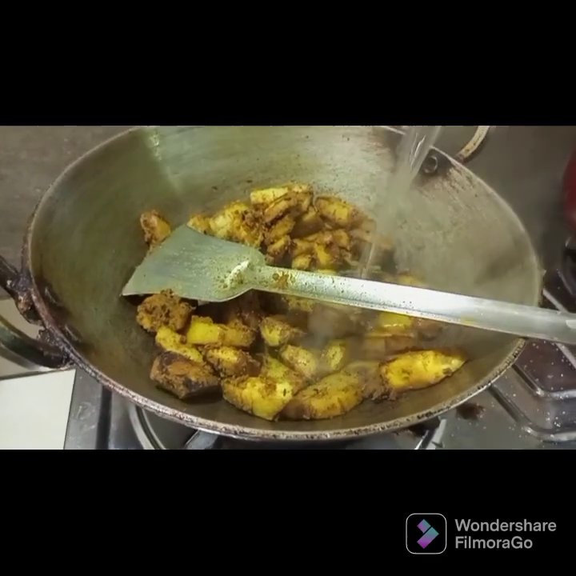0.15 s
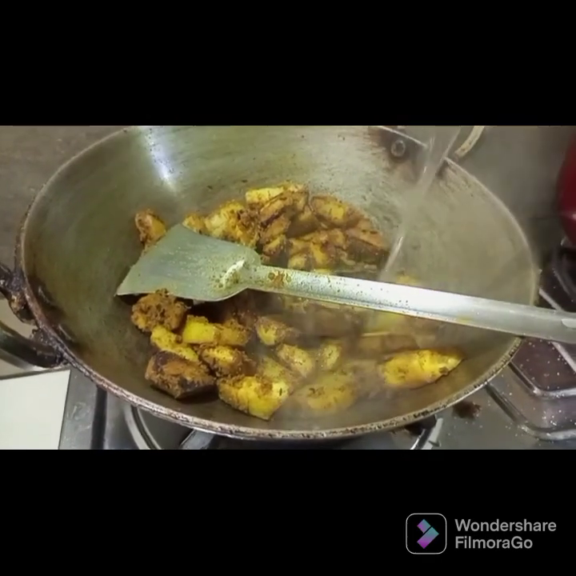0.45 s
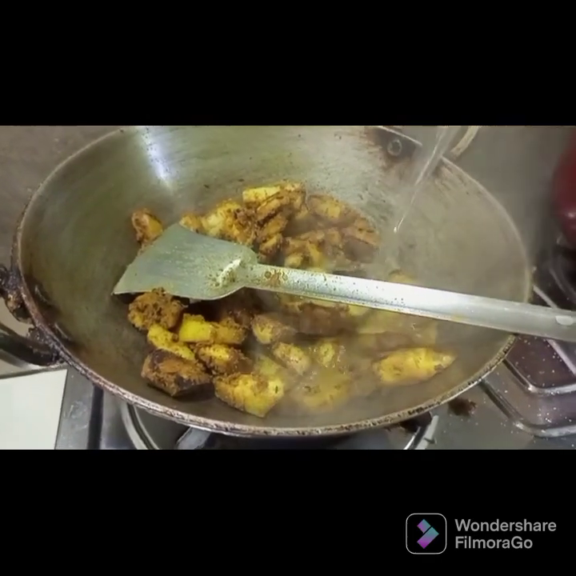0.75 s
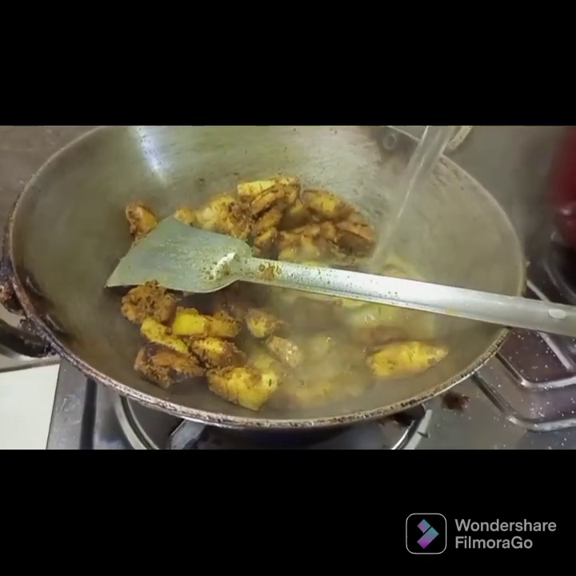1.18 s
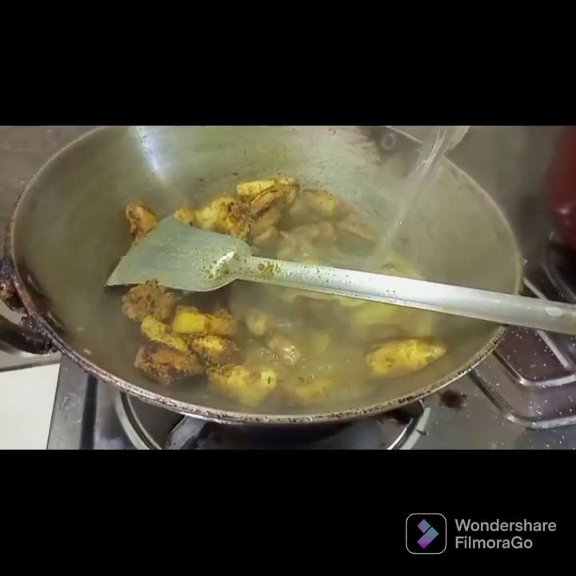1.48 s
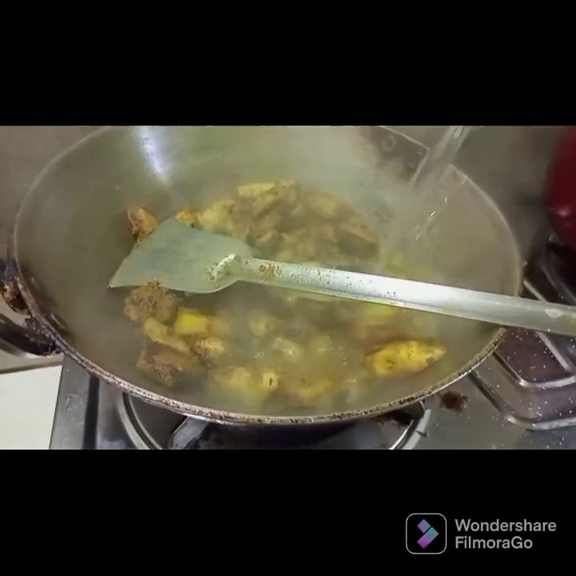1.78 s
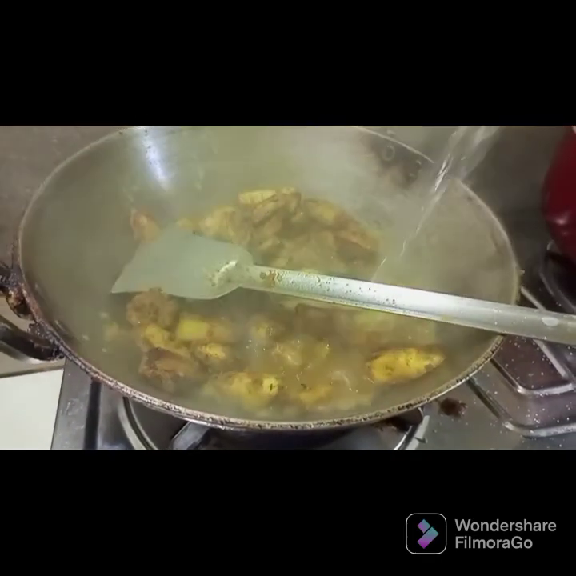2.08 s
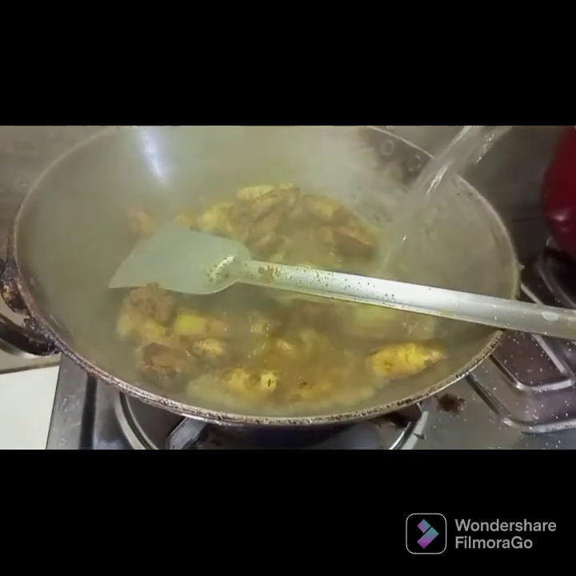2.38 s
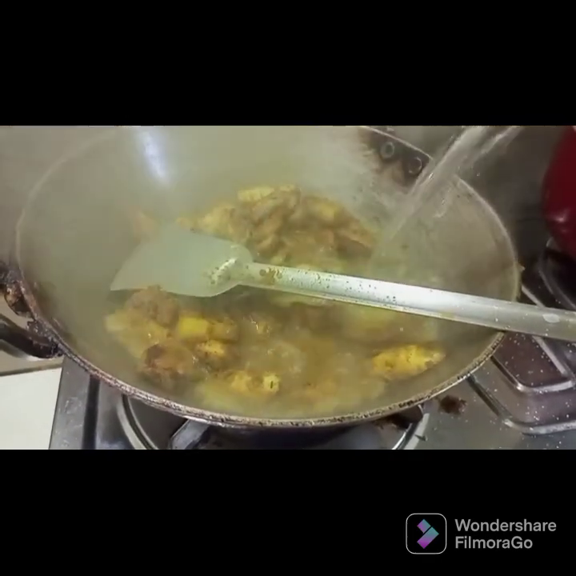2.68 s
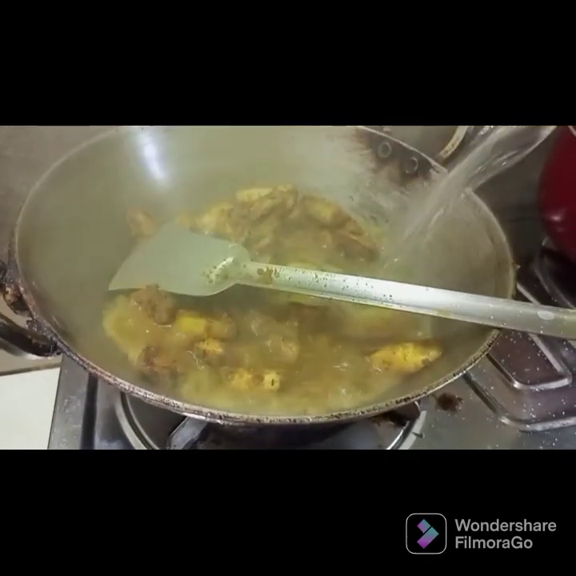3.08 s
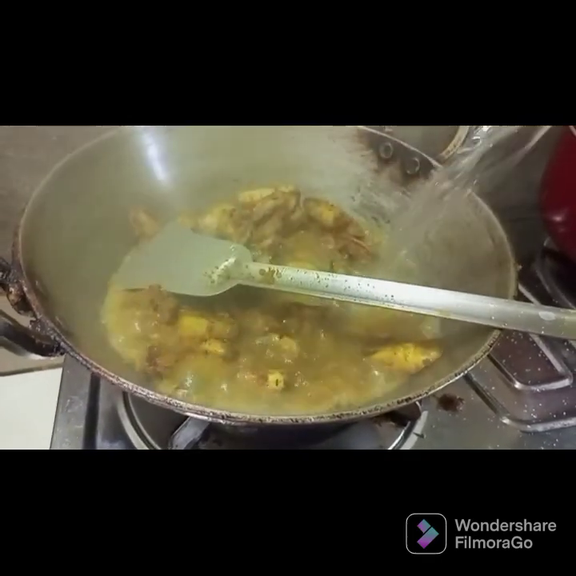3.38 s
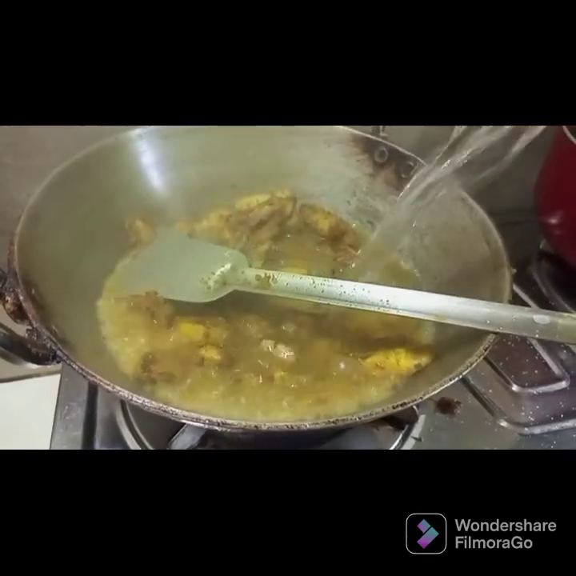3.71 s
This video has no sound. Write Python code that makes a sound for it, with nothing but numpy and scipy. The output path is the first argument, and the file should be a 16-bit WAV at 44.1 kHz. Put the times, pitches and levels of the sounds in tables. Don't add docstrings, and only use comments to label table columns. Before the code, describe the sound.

Water poured into a hot steel pan sizzles and hisses brightly, then gradually dies down

```python
import sys
import numpy as np
from scipy import signal
from scipy.fft import rfft, irfft, next_fast_len
from scipy.io import wavfile
from scipy.ndimage import uniform_filter1d, map_coordinates

SR = 44100
rng = np.random.default_rng(int(sys.argv[2]) if len(sys.argv) > 2 else 0)


def nominal_scale(level):
    x = np.asarray(level, float) / 20
    return 10 ** x


def file_out(sig):
    cols = np.atleast_2d(sig).T
    lim = np.clip(cols, -1, 1)
    pcm = np.round(lim * 32767).astype(np.int16)
    wavfile.write(sys.argv[1], SR, pcm)


N = 169785
TIME_S = np.arange(N) / SR


def unit(x):
    return x / np.sqrt(np.mean(x ** 2) + 1e-20)


def wobble(rate):
    knots = rng.standard_normal(int(N * 40 / SR) + 4)
    return map_coordinates(knots, [np.arange(N) * min(rate, 40) / SR])


def swing_of(rows):
    start_s, level_db = np.transpose(rows)
    curve = np.interp(TIME_S, start_s, level_db)
    return curve.mean(), curve - curve.mean()


def filtered(x, response):
    m = next_fast_len(N + SR // 2)
    return irfft(rfft(x, m) * response(np.fft.rfftfreq(m, 1 / SR)), m)[..., :N]


def coloured(x, spectrum):
    f, db = np.transpose(spectrum)
    return unit(filtered(x, lambda hz: nominal_scale(np.interp(np.log(hz + 1), np.log(f + 1), db))))


def patchy(patchy_db, wide, long):
    z = signal.stft(rng.standard_normal(N), nperseg=512)[2]
    field = uniform_filter1d(rng.standard_normal(z.shape), wide, axis=0)
    field = uniform_filter1d(field, long, axis=1)
    return unit(signal.istft(z * nominal_scale(patchy_db * unit(field)), nperseg=512)[1][:N])


def bubbles(count, low_hz, high_hz, cycles, spread_db, size):
    when, pitch, big, turn = rng.random((count, 4)).T[:, :, None]
    hz = low_hz + (high_hz - low_hz) * pitch
    k = np.arange(size)
    life = k / SR * hz / cycles
    strength = nominal_scale(-spread_db * np.log(big + 1e-4)) * np.sqrt(hz)
    tone = strength * life * np.exp(-3 * life) * np.sin(2 * np.pi * (hz * k / SR + turn))
    tone = tone * np.hanning(2 * size)[size:]
    return unit(np.bincount(((when * N).astype(int) + k).ravel(), tone.ravel(), N + size)[:N])


def ticks(count, spread_db):
    when, big = rng.random((count, 2)).T
    return unit(np.bincount((when * N).astype(int), -nominal_scale(-spread_db * np.log(big + 0.021)), N))


def singing(rows):
    rise, flutter_db, drift_rad = .015, 3, .9
    out = np.zeros(N)
    for s, hz, db, length in rows:
        near = slice(max(int((s - 2 * length) * SR), 0), int((s + 2 * length) * SR))
        u = (TIME_S[near] - s) / length
        knots = rng.standard_normal((2, 20))
        shake, drift = map_coordinates(knots, [[0 * u, 0 * u + 1], [4 * u + 10] * 2], mode="nearest")
        turn = 2 * np.pi * hz * length * (u + rise * u * u / 2) + drift_rad * drift
        out[near] += nominal_scale(db + 7.5 + flutter_db * shake) * np.exp(-2.5 * u * u) * np.sin(turn)
    return out


def hum():
    return np.sin(2 * np.pi * 100 * np.arange(N) / SR) * nominal_scale(-44 + 1.4 * wobble(6))


# pitch_hz [Hz], level_db [dB per Hz]
BURNER_SPECTRUM = [(25, -35), (45, -19), (70, -11.5), (160, -5), (243, -8), (420, -8), (560, -14.5),
                   (780, -32.5)]


def burner():
    return coloured(patchy(0.82, wide=2, long=8), BURNER_SPECTRUM)


# start_s [s], pitch_hz [Hz], level_db [dB rms], length_s [s]
GULP_EVENTS = [(.08, 382, -63, .07), (.21, 487, -62, 0.055), (0.272, 297, -66, 0.056),
               (0.686, 110, -66, 0.035), (.76, 151, -65, 0.039), (.85, 275, -68, 0.045),
               (1.1, 480, -60, 0.045), (1.248, 317, -66, 0.12), (1.3, 151, -65, 0.025),
               (1.682, 285, -66.5, 0.087), (1.806, 293, -68, 0.047), (.02, 90, -68, 0.016),
               (.64, 302, -58, 0.022), (.72, 320, -61, .025), (.97, 62, -83, 0.034), (1.05, 75, -67, .025),
               (1.32, 90, -70, 0.016), (1.12, 290, -64, .03), (2.16, 169, -64, 0.032),
               (2.36, 120, -74, .025), (2.65, 160, -68, 0.028), (2.125, 75, -63, 0.028),
               (2.947, 75, -70, .03), (3.165, 81, -63, 0.031), (2.48, 706, -74, 0.038),
               (2.95, 696, -67, 0.04), (1.88, 500, -61, 0.021), (3.24, 197, -71, .04),
               (3.82, 506, -65, 0.036)]


def gulps():
    return nominal_scale(-5.5) * singing(GULP_EVENTS)


# start_s [s], pitch_hz [Hz], level_db [dB rms], length_s [s]
SINGER_EVENTS = [(.035, 1270, -47, 0.015), (.058, 5986, -32, .02), (.131, 3555, -40, 0.027),
                 (.139, 1190, -47, 0.032), (.197, 1340, -51, .025), (.418, 2070, -47, 0.032),
                 (.438, 3430, -40, 0.042), (.572, 4180, -33.5, 0.022), (.2, 900, -54, 0.044),
                 (.29, 843, -51, 0.017), (.229, 486, -55, .04), (.432, 1280, -47, 0.027),
                 (.496, 925, -52, 0.043), (.554, 1900, -46, 0.034), (.862, 3950, -32, 0.018),
                 (.801, 1350, -52, 0.031), (.879, 1390, -51, 0.022), (.891, 3531, -36, 0.018),
                 (1.013, 5940, -41, .02), (1.088, 3540, -38, 0.041), (1.097, 4360, -41, 0.06),
                 (1.109, 1244, -49, 0.023), (1.196, 3430, -37.5, 0.044), (1.263, 5383, -35.5, 0.025),
                 (1.643, 3350, -40, .025), (1.692, 3560, -42, 0.022), (1.884, 3900, -44, .025),
                 (1.384, 2007, -42, 0.049), (1.8, 2800, -41, 0.037), (1.919, 875, -52, 0.035),
                 (2.098, 1810, -43, 0.038), (2.104, 2205, -49, 0.045), (2.162, 1740, -49, 0.025),
                 (2.235, 6350, -44, 0.023), (2.267, 3450, -44, 0.018), (2.351, 3330, -44, 0.021),
                 (2.551, 3160, -44, 0.021), (2.711, 6360, -43, .02), (2.505, 2770, -47, 0.05),
                 (2.725, 1864, -47, 0.016), (2.972, 893, -56.5, 0.045), (2.978, 1260, -56, 0.023),
                 (3.175, 1880, -61, 0.036), (3.309, 2230, -51, .02), (3.515, 2972, -48, 0.031),
                 (3.596, 2000, -55, .02), (3.695, 3510, -48, .025), (3.825, 1200, -56, 0.03)]


def singers():
    return nominal_scale(-6) * singing(SINGER_EVENTS)


# start_s [s], lift_db [dB], length_s [s]
SPURT_EVENTS = [(0.128, 0.5, 0.017), (0.245, 1.5, .02), (0.343, 1.5, 0.013), (0.403, 1.5, .02),
                (0.57, 0.5, 0.02), (0.586, -2.5, 0.0098), (0.724, 2, 0.032), (0.864, -0.5, 0.019),
                (1.13, -1, .02), (1.31, -1, 0.015), (1.524, -0.5, .015), (2.448, -1.5, 0.016),
                (2.47, 1, .02), (2.555, 1, 0.014), (2.716, 1.5, 0.031), (2.78, 2, 0.018), (2.855, 0, .012),
                (2.901, 2, 0.0092), (3.05, 0, .015), (3.2, -0.5, .015), (3.36, -0.5, .02), (3.52, -1, .02),
                (3.557, -0.5, 0.018), (3.698, 1, 0.022)]


def surges():
    spurts_db = sum(db * np.exp(-((TIME_S - s) / length) ** 2) for s, db, length in SPURT_EVENTS)
    return 0.22 * wobble(4.76) + 0.1 * wobble(9.4) + 0.74 * spurts_db


# pitch_hz [Hz], level_db [dB per Hz]
MIST_SPECTRUM = [(10500, -33), (12100, -1), (12400, -4), (13700, -9.5), (14400, -3), (15000, 2), (15500, 0),
                 (15900, 0)]


def mist(pops):
    return coloured(patchy(1.4, wide=14, long=8) + pops, MIST_SPECTRUM)


# start_s [s], level_db [dB over the mean mist]
SPIT_EVENTS = [(.155, 0), (.975, 0), (1.037, 1), (1.522, 6), (1.54, 1), (1.683, -1), (1.83, -1), (2.08, -1),
               (2.88, -1), (3.09, 0), (3.16, -2), (3.30, -1), (3.49, 0), (3.7, -2)]
# pitch_hz [Hz], level_db [dB per Hz]
SPIT_SPECTRUM = [(9000, -25), (13000, -10), (14600, -2), (15300, 0), (16000, 0)]


def spits():
    puffs = sum(nominal_scale(db) * np.exp(-((TIME_S - s) / .008) ** 2) for s, db in SPIT_EVENTS)
    return puffs * coloured(rng.standard_normal(N), SPIT_SPECTRUM)


# pitch_hz [Hz], level_db [dB per Hz]
SPLASH_SPECTRUM = [(300, -53), (480, -19), (600, -14), (883, -9.5), (1240, -6), (1600, -7.5), (2600, -4.5),
                   (4200, -14.5)]


def splash(pops):
    noise = pops + patchy(1.8, wide=2, long=8)
    drops = bubbles(count=1000, low_hz=397, high_hz=3203, cycles=73, spread_db=0.4, size=1200)
    return coloured(noise + 0.22 * drops, SPLASH_SPECTRUM)


# pitch_hz [Hz], level_db [dB per Hz]
HISS_SPECTRUM = [(4500, -32.5), (7000, 0), (8300, -2), (10300, 1), (11900, -5.5), (12400, -32),
                 (14000, -46)]


def hiss(pops):
    noise = pops + patchy(0.17, wide=12, long=7)
    bursts = bubbles(count=8000, low_hz=7260, high_hz=16300, cycles=4.4, spread_db=0.5, size=50)
    return coloured(noise + 0.24 * bursts, HISS_SPECTRUM)


# pitch_hz [Hz], level_db [dB per Hz]
FIZZ_SPECTRUM = [(1200, -35.5), (2300, -14.5), (3500, -2), (4020, -2), (4850, -7.5), (5980, 0),
                 (7100, -6.5), (9000, -27.5)]
# start_s [s], level_db [dB]
BRIGHT_CURVE = [(0, 1.1), (.5, 2), (.9, 0.5), (1.2, 0.5), (1.5, 0.3), (2, -1.1), (2.7, 0.1), (3.2, -1),
                (3.85, -0.5)]


def fizz(pops):
    noise = pops + patchy(1.4, wide=3, long=9)
    bursts = bubbles(count=3000, low_hz=1993, high_hz=8993, cycles=67, spread_db=1.0, size=400)
    boil = coloured(noise + 0.22 * bursts, FIZZ_SPECTRUM)
    small = filtered(boil, lambda hz: hz > 4900)
    return boil + (nominal_scale(swing_of(BRIGHT_CURVE)[1]) - 1) * small


# pitch_hz [Hz], width_hz [Hz], lift_db [dB]
WOK_MODES = [(293, 24, 7), (379, 14, 8.5), (431, 54, -4), (473.4, 34, 7.5), (507, 37, 3), (600, 33, -6.5),
             (885, 33, 5), (1277, 110, 4.5), (1390, 54, 0.5), (1807, 115, 4.5), (2070, 59, 1.5),
             (2306, 69, 2), (2735, 31, 3), (3396, 54, 3.5)]


def wok(x):
    def lift(f):
        return nominal_scale(sum(db / (1 + (2 * (f - c) / w) ** 2) for c, w, db in WOK_MODES))
    return filtered(x, lift)


# start_s [s], level_db [dB]
HEAT_CURVE = [(0, -31.5), (.35, -32), (.85, -31), (1.05, -32), (1.35, -33), (1.55, -32.5), (1.95, -35.5),
              (2.25, -36.5), (2.43, -37.5), (2.49, -35.5), (2.65, -36.8), (2.78, -38.5), (2.84, -38.5),
              (3.15, -40.5), (3.55, -40.5), (3.7, -41), (3.78, -43.5), (3.85, -40.5)]
# start_s [s], level_db [dB]
POUR_CURVE = [(0, -43.5), (.5, -45.5), (1.0, -44), (1.3, -46.5), (1.6, -44.5), (1.9, -46), (2.15, -45),
              (2.4, -47), (2.7, -48.5), (3.2, -50), (3.85, -52)]


def sizzle():
    mean_db, swing = swing_of(HEAT_CURVE)
    stream = swing_of(POUR_CURVE)[1]
    pops = nominal_scale(-11) * ticks(count=4000, spread_db=3.5)
    spray = mist(pops)
    surge = surges()
    fizzing, hissing, splashing = fizz(pops), hiss(pops), splash(pops)
    flame, murmur = burner(), hum()
    mist_db = -8.5
    pan = nominal_scale(-0.8 + 0.86 * swing + 1.47 * surge + 0.14 * wobble(8.22)) * fizzing
    pan += nominal_scale(-3.5 + 0.59 * swing + 0.16 * surge + 0.084 * wobble(8.25) + 0.083 * wobble(60)) * hissing
    pan += nominal_scale(-10.5 + stream + 0.64 * surge + 0.69 * wobble(6.67)) * splashing
    pan += nominal_scale(mist_db + .7 * swing + 0.88 * surge + 0.3 * wobble(6.1) + 1.1 * wobble(21)) * spray
    pan += nominal_scale(mist_db) * spits()
    pan += nominal_scale(-32.5 + 0.45 * swing + 0.27 * surge + 0.96 * wobble(6.81)) * flame
    return nominal_scale(mean_db) * (wok(pan) + murmur)


def kitchen(x):
    t60_s, tail_db = .15, -14
    t = np.arange(SR // 3) / SR
    tail = rng.standard_normal(len(t)) * nominal_scale(-60 * t / t60_s)
    return x + nominal_scale(tail_db) * signal.fftconvolve(x, tail / np.linalg.norm(tail))[:N]


# start_s [s], low_hz [Hz], high_hz [Hz], level_db [dB rms]
FLECK_EVENTS = [(0.59, 4270, 5160, -45), (.847, 8950, 10330, -46), (1.079, 13050, 14470, -56),
                (1.126, 6250, 7540, -41), (1.358, 10400, 11700, -46), (2.099, 4730, 5770, -48),
                (2.101, 13050, 14470, -60), (2.147, 12400, 14470, -58), (2.193, 5680, 6860, -47),
                (2.751, 11700, 13050, -54), (3.053, 11600, 15700, -52), (3.238, 5760, 6900, -49),
                (3.238, 14470, 15700, -59), (3.749, 9650, 11700, -49), (3.772, 8300, 11000, -51)]


def flecks():
    frame, offset = 2048, 441
    half = frame // 2
    side, line = np.zeros(N + frame), np.arange(half) + .5
    waves = np.cos(np.pi / half * np.outer(np.arange(frame) + .5 + half / 2, line))
    window = signal.windows.kaiser_bessel_derived(frame, 4 * np.pi)
    line_hz = line * SR / frame
    for s, low_hz, high_hz, db in FLECK_EVENTS:
        band = waves @ (rng.standard_normal(half) * (line_hz > low_hz) * (line_hz < high_hz))
        start = offset + half * (round((s * SR - offset) / half) - 1)
        side[start:][:frame] += nominal_scale(db) * unit(band) * window
    return side[:N]


def scene():
    mono = kitchen(sizzle() + singers() + gulps())
    return np.array([mono, mono])


def low_pass(x):
    return signal.sosfilt(signal.butter(12, 17090, fs=SR, output="sos"), x)


def record(dry):
    kept = filtered(dry, lambda hz: hz < 15730)
    mix = kept + flecks() * [[1], [-1]]
    return low_pass(mix)


dry = scene()
out = record(dry)
file_out(out)
```